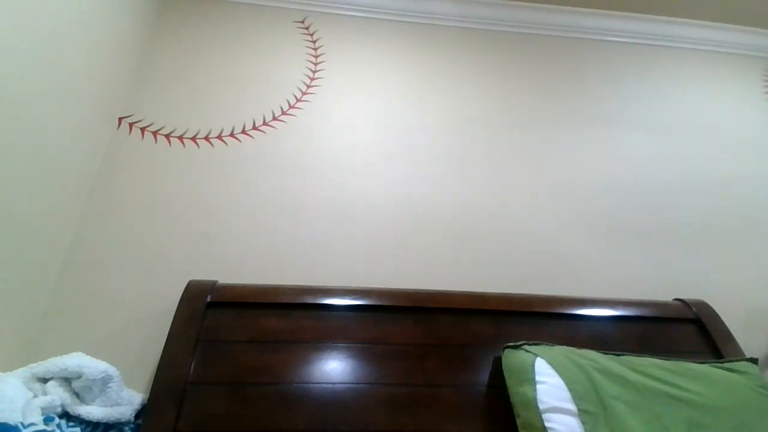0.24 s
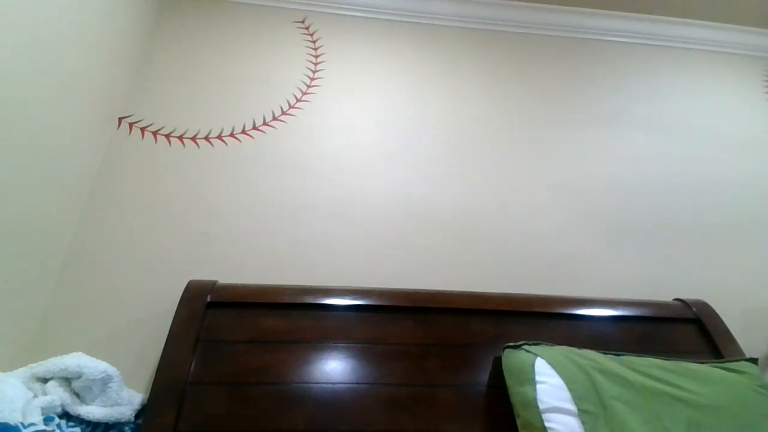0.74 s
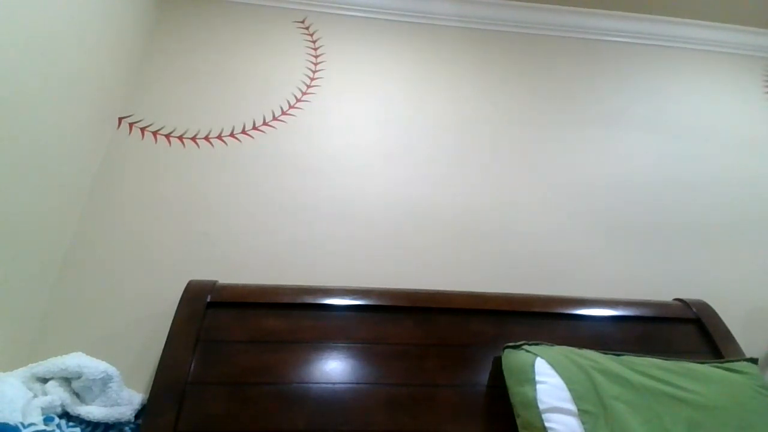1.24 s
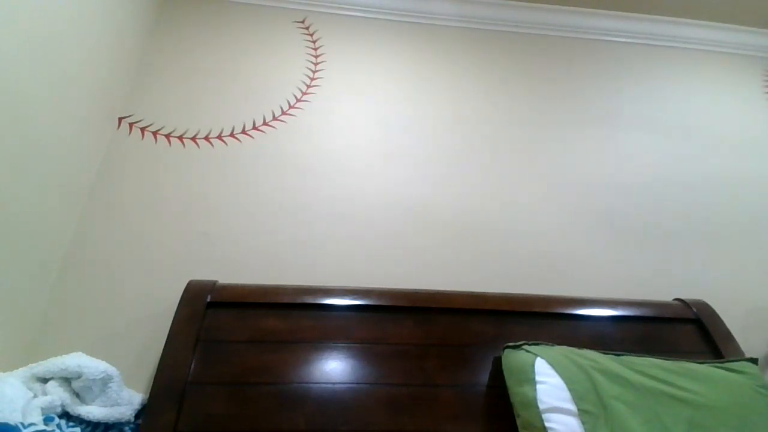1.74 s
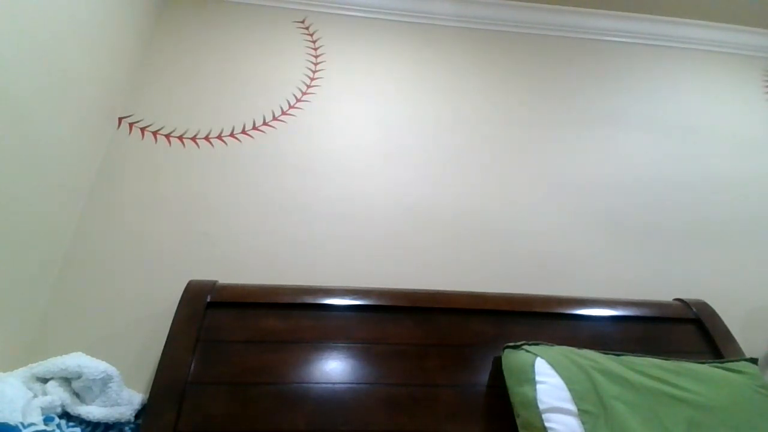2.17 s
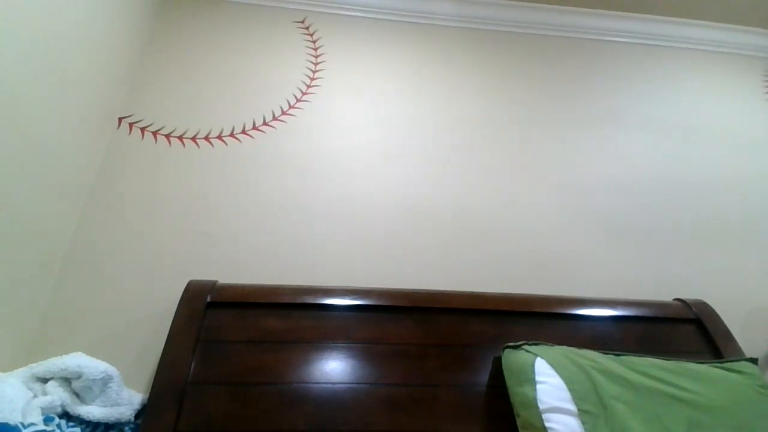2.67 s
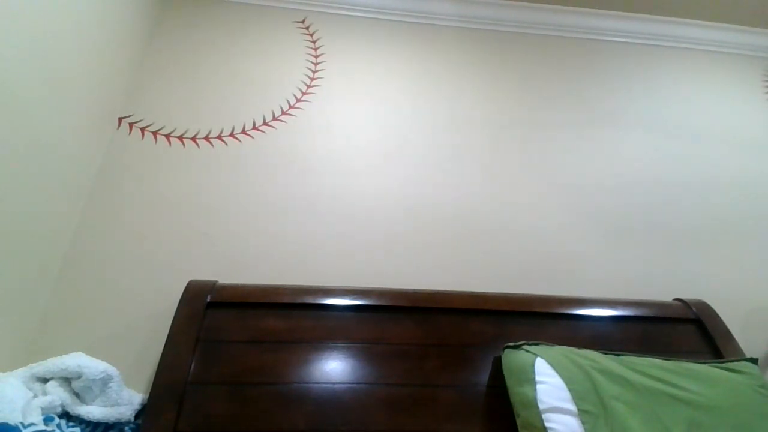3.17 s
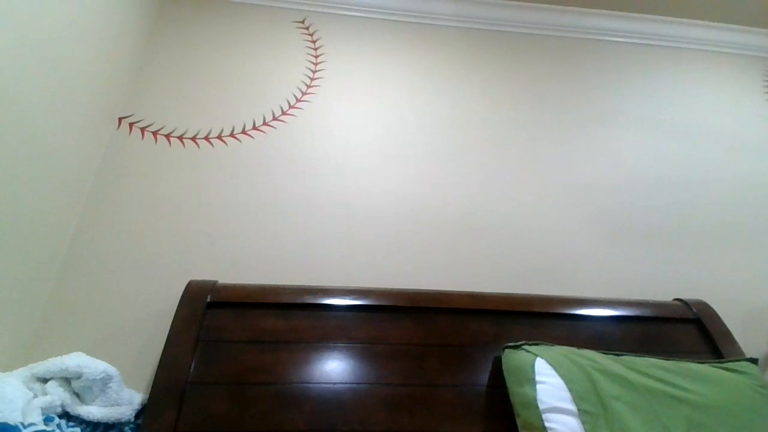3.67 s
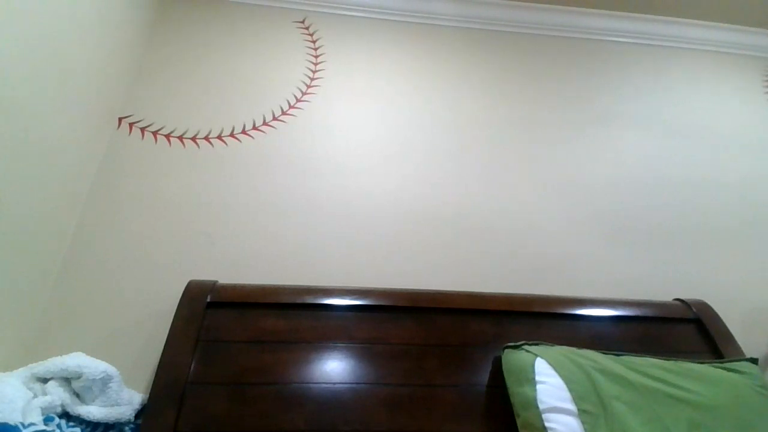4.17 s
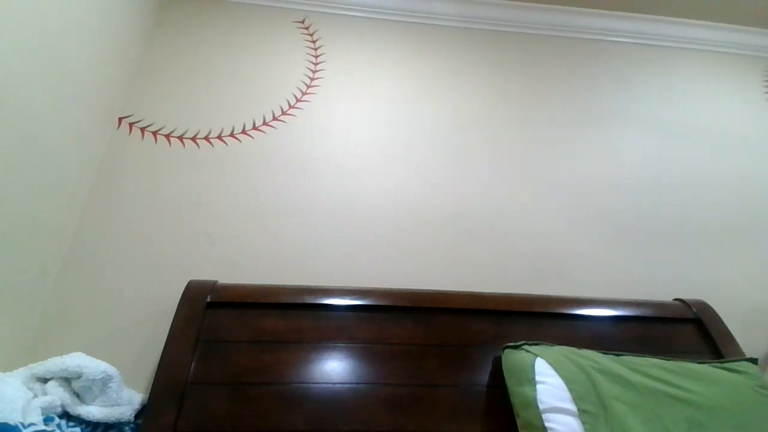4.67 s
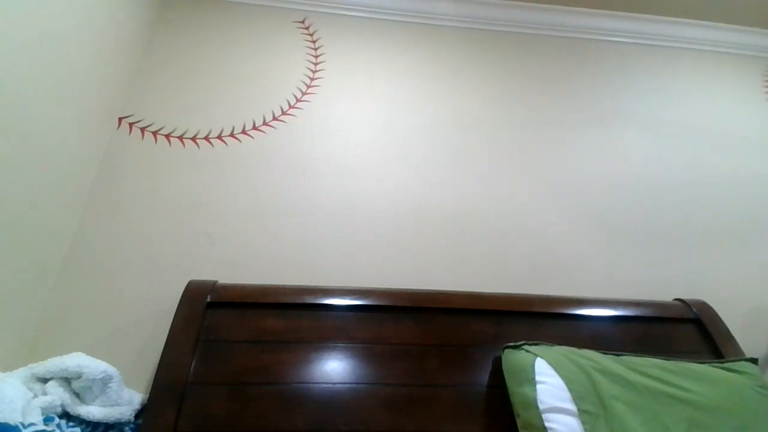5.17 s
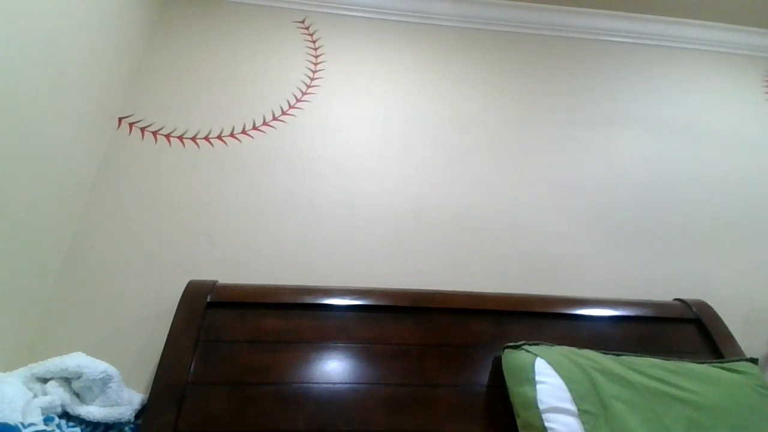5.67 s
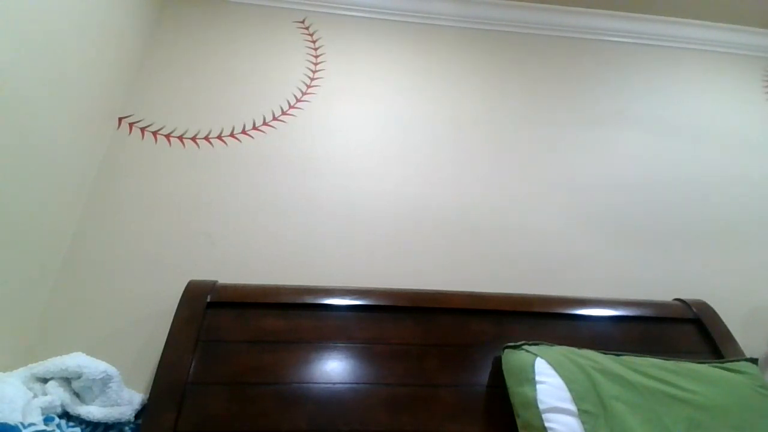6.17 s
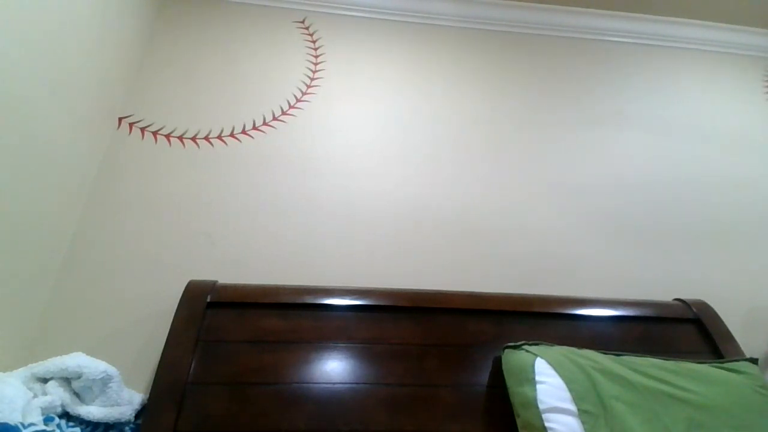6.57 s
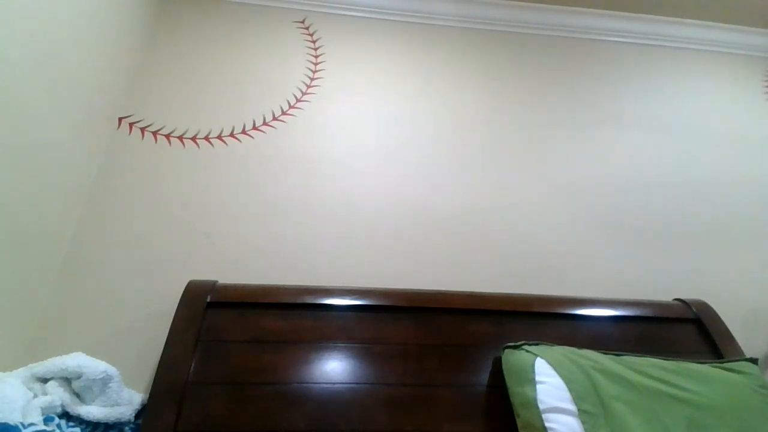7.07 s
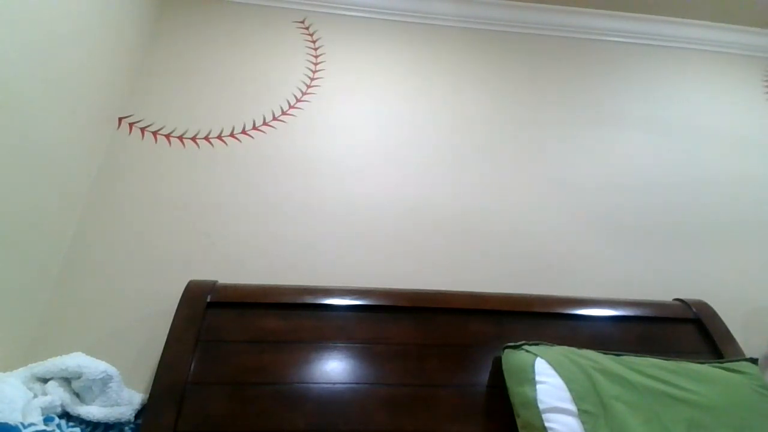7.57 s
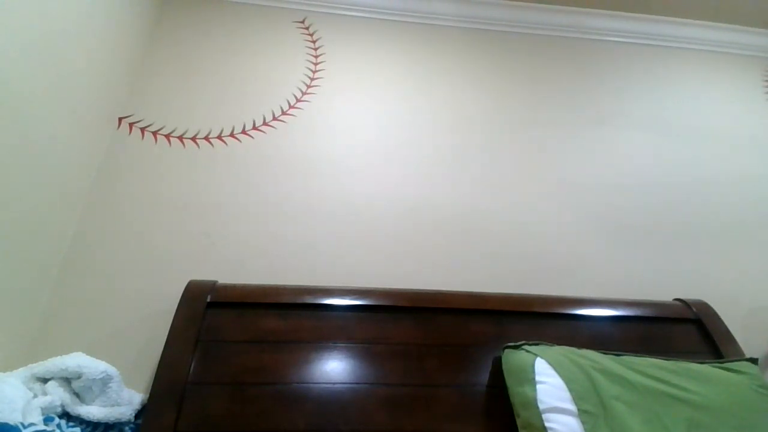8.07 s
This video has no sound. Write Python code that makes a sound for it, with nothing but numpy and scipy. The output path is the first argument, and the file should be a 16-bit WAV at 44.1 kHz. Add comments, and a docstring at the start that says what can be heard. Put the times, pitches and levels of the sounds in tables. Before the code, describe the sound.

Someone rummages irregularly through drawing supplies in a small bedroom, knocking wood and drawing out paper, while a fan hums steadily.

```python
"""Pencils and pens click, rattle and slide in their box, things are set down on wood, then paper is
drawn out and laid aside with a soft bump, in a small bedroom where a fan hums and rumbles steadily.
Contacts are coloured noise bursts and struck damped modes; sliding, scraping and paper are coloured
noise shaped by motion and grain; the fan is wavering sines plus noise. Reflections and short tails
give the room; level and phase differences give two closely spaced microphones."""
import sys
import numpy as np
from scipy import signal
from scipy.fft import rfft, irfft, next_fast_len
from scipy.io import wavfile
from scipy.ndimage import map_coordinates

SR = 44100
rng = np.random.default_rng(int(sys.argv[2]) if len(sys.argv) > 2 else 0)


def master_out(mix):
    """Clip the mix to full scale and print it as 16-bit PCM to the path in sys.argv[1]."""
    frames = np.transpose(np.atleast_2d(mix))
    ceiling = np.clip(frames, -1, 1)
    pcm = np.round(ceiling * 32767).astype(np.int16)
    wavfile.write(sys.argv[1], SR, pcm)


N = 366912

# basic spectrum of a contact between hard parts: frequency_hz, level_db
CONTACT_COLOUR = [(100, -18), (250, -3), (480, -7), (900, -8), (1400, -7.5), (2300, -8), (4000, -6),
                  (8000, -9.5), (16000, -15.5)]
# left-right correlation chosen for the stereo image, wide in the middle range, narrow in the lows
# and the extreme highs: frequency_hz, correlation (-1 to 1)
STEREO_IMAGE = [(250, 0.98), (600, 0.9), (1200, 0.61), (1900, 0.053), (3200, -0.54), (4500, -0.5),
                (6200, -0.069), (9000, 0.011), (11500, 0.13), (12400, 1)]
# reverberation time of the bedroom: frequency_hz, t60_s
ROOM_T60 = [(150, 0.43), (500, 0.26), (1500, 0.29), (5000, 0.27), (15000, 0.18)]


def amp(db):
    """Level to amplitude: 20 dB is a factor of ten."""
    return 10 ** (np.asarray(db) / 20)


def unit(x):
    """Normalisation to an rms of 1."""
    return x / np.sqrt(np.mean(x ** 2) + 1e-20)


def along(points, hz):
    """Interpolation of (frequency, value) points on a logarithmic frequency axis."""
    f, v = np.transpose(points)
    return np.interp(np.log(hz + 1e-3), np.log(f), v)


def wobble(rate):
    """Random modulation: a smooth curve through random knots, rate of them a second."""
    knots = rng.standard_normal(int(N * rate / SR) + 4)
    return map_coordinates(knots, [np.arange(N) * rate / SR])


def filtered(x, response):
    """Linear filtering: the spectrum is multiplied by a function of frequency."""
    n = x.shape[-1]
    m = next_fast_len(n + 8192)
    hz = np.fft.rfftfreq(m, 1 / SR)
    return irfft(rfft(x, m) * response(hz), m)[..., :n]


def spread(pair, correlation):
    """Partial coherence: two independent signals mix into left and right of a given correlation."""
    def mid_side_gains(hz):
        angle = np.arccos(np.clip(along(correlation, hz), -1, 1)) / 2
        return np.array([np.cos(angle), np.sin(angle)])

    mid, side = filtered(pair, mid_side_gains)
    return np.array([mid + side, mid - side])


def noise(colour, correlation, size):
    """Spectral shaping: white noise becomes coloured stereo noise of rms 1."""
    white = spread(rng.standard_normal((2, size)), correlation)
    return unit(filtered(white, lambda hz: amp(along(colour, hz))))


def add(track, s, sound):
    """Superposition: a sound is mixed into the track at time s."""
    start = max(round(s * SR), 0)
    track[:, start:start + sound.shape[-1]] += sound[..., :N - start]


def reverberant_decay(x):
    """Exponential decay: each frequency band falls 60 dB in its own reverberation time."""
    hz, frames_s, z = signal.stft(x, SR, nperseg=256)
    decay = amp(-60 * frames_s / along(ROOM_T60, hz)[:, None])
    return signal.istft(z * decay, SR, nperseg=256)[1]


def burst(colour, early_s, tail_db, rise_s):
    """Impact in a room: noise with three sharp rebounds in a dense bunch, then a reverberant tail."""
    t = np.arange(SR // 2) / SR
    tail = reverberant_decay(noise(colour, STEREO_IMAGE, len(t)))[:, :len(t)]
    # one rebound at a random moment in each third of the early part
    rebounds_s = (np.arange(3)[:, None] + rng.uniform(.15, .85, (3, 1))) * early_s / 3
    spike_power = np.sum(np.exp(-((t - rebounds_s) / .0004) ** 2), 0)
    early = noise(colour, STEREO_IMAGE, len(t)) * np.sqrt(.55 + 2.6 * spike_power)
    early = early * np.exp(-((t - rise_s) / early_s) ** 4)
    return (early + amp(tail_db) * tail) * (1 - np.exp(-t / rise_s))


def ring(modes, scatter_db, detune):
    """Modal vibration: a blow excites damped sines, with new strengths and tuning each time."""
    t = np.arange(SR // 2) / SR
    hz, db, t60_s = np.transpose(modes)[:, :, None]
    size, shift, phase = rng.standard_normal((3, len(hz), 1))
    waves = np.sin(2 * np.pi * (hz * (1 + detune * shift) * t + phase))
    level_db = db + scatter_db * np.clip(size, -2, 1) - 60 * t / np.minimum(t60_s, .6)
    onset = 1 - np.exp(-t / 0.0038)
    return np.sum(amp(level_db) * waves, 0) * onset


def stroke(s, length_s, swell_db, attack_s, release_s):
    """Motion envelope: a hand movement gets going, swells or fades evenly in dB, then comes to rest."""
    t = np.arange(N) / SR - s
    rise = np.clip(t / attack_s, 0, 1)
    rest = np.exp(-np.maximum(t - length_s, 0) / release_s)
    return rise * amp(swell_db * np.clip(t / length_s, 0, 1)) * rest


def clicks():
    """Contact hardness: hard contacts rise at once and brightly, soft ones swell and ring the barrels."""
    # pencils and plastic cases touching: start_s, level_db, then low body_db, snap_db and
    # sharp edge_db relative to the level
    contacts = [(0.37, -41, -12.5, -18.5, -15.5), (0.507, -27.5, -18, -24.5, -19),
                (0.551, -37.5, -19, -24, -41), (0.651, -39.5, -8.5, -17, -9.5), (0.736, -44, -9, -48, -35),
                (0.798, -48, -20, -27, -36), (1.27, -35, -19, -22, -17), (1.357, -34.5, -9, -15.5, -16.5),
                (1.376, -40, -9, -14, -11), (1.464, -36, -11, -22, -42), (1.673, -36, -16, -15, -17.5),
                (1.785, -32.5, -3.5, -19.5, -13.5), (1.801, -33.5, -13.5, -33, -48),
                (1.877, -22.5, -12.5, -12, -17.5), (1.936, -19, -13, -2.5, 3),
                (1.955, -19, -17.5, -6.5, -5), (2.022, -29, -13.5, -20, -34), (2.559, -37, 6, -11, -1),
                (2.678, -40.5, 3.5, -11.5, -3), (2.787, -35.5, -15, -29, -29),
                (2.822, -32.5, -16, -19, -13), (3.115, -37, -10.5, -25, -22), (3.337, -49.5, -10, 12, 20),
                (3.614, -38.5, -6, -28, -33), (3.659, -25, -11.5, -9, -5), (3.683, -38, -20, -8, -5),
                (3.741, -42.5, -14, -41, -9), (4.364, -56, -8, -26, -25), (4.971, -40.5, -1, -23, -27),
                (5.264, -37.5, -33, -25, -30), (5.418, -62, -16, 11, -13), (5.58, -37, -6, -12.5, -29),
                (5.676, -33.5, -24, -16.5, -16.5), (5.716, -34, -12, -20, -34), (6.455, -40.5, -2, 4, 15),
                (6.484, -36.5, 0, -11, -22), (6.622, -44, 1, -7, 12), (7, -39, -25, 0, 16),
                (7.64, -47, -10, 3, 12), (7.838, -26, -42, -6, -17.5)]
    # modes of the box and the barrels in it: frequency_hz, level_db, t60_s
    barrels = [(690, -8.5, 0.38), (902, -2, 0.13), (1180, 1, 0.073), (1289, 4.5, 0.077), (1414, -6, 0.1),
               (1910, -13, 0.092)]
    out = np.zeros((2, N))
    hz, base_db = np.transpose(CONTACT_COLOUR)
    for s, db, body_db, snap_db, edge_db in contacts:
        tilt = [(450, body_db + 10.5), (900, 0), (1600, 0.0042),
                (3500, snap_db + 9.0), (5500, snap_db + 6.0), (9500, edge_db + 5)]
        colour = np.transpose([hz, base_db + along(tilt, hz)])
        softness = amp(-.5 * np.clip(edge_db + 12, -12, 12))  # a weak edge means a soft contact
        impact = burst(colour, early_s=0.00884, tail_db=-3.5, rise_s=.0035 * softness)
        add(out, s, amp(db - 5) * impact)
        add(out, s, amp(db - 21) * softness * ring(barrels, scatter_db=6, detune=0.0125))
    return out


def scrapes():
    """Friction noise: each push of a barrel along the others swells and fades with a rough level."""
    # single pushes: start_s, level_db, length_s, brightness_db
    pushes = [(0.0, -49.5, 0.0032, 2), (1.108, -54, 0.016, -1.5), (1.643, -47, 0.01, -9),
              (2.279, -46, 0.017, 0), (2.377, -37.5, 0.017, -4.5), (2.577, -46, 0.01, -1),
              (3.561, -52.5, 0.014, -10), (4.89, -48, 0.023, -14.5), (5.031, -43.5, 0.023, -5.5),
              (5.162, -46, 0.019, 12), (5.23, -44, 0.015, -8.5), (5.396, -46.5, 0.014, -11),
              (5.616, -50.5, 0.0073, -5), (5.965, -55, 0.014, 11), (7.028, -49, 0.012, 8),
              (7.281, -46.5, 0.0074, 8)]
    out = np.zeros((2, N))
    hz, base_db = np.transpose(CONTACT_COLOUR)
    for s, db, length_s, bright_db in pushes:
        tilt = [(500, -4.5), (1500, -0.1), (3500, bright_db - 7.5),
                (7500, bright_db - 8.5), (14000, bright_db - 10.5)]
        colour = np.transpose([hz, base_db + along(tilt, hz)])
        push = burst(colour, early_s=1.78 * length_s, tail_db=2.5, rise_s=length_s)
        add(out, s, amp(db - 2.0) * push)
    roughness = amp(0.73 * wobble(220))
    return out * roughness


def sliding():
    """Stick-slip friction: barrels catch and slip, so a scrape carries many tiny decaying ticks."""
    # stirs of the pencils: start_s, length_s, level_db, swell_db from start to end
    stirs = [(0.546, .06, -59, -14), (0.652, 0.13, -59.5, -13), (1.282, 0.072, -54.5, 4),
             (1.357, 0.16, -48.5, -7.5), (1.586, 0.34, -54, -13), (2.467, 0.3, -45, -22.5),
             (2.79, 0.11, -59, -6), (3.015, 0.052, -67.5, 9.5), (3.603, 0.077, -59, 8.5),
             (4.84, 0.015, -61, -1), (5.004, 0.029, -50.5, 6), (5.038, 0.14, -45, -11),
             (5.163, 0.14, -49, -6), (5.37, 0.013, -57, -2.5), (5.409, 0.034, -54, -2),
             (5.507, 0.028, -51, -0.5), (5.582, 0.17, -50.5, -3.5), (5.893, 0.15, -70, -6)]
    # mean spectrum of the sliding: frequency_hz, level_db
    slide_colour = [(120, -21), (250, -3), (400, -12), (600, -10), (950, -4), (1400, -8), (2000, -10),
                    (2600, -18), (3300, -16), (7000, -24.5), (10000, -27.5), (16000, -29)]
    slips_per_s, slip_s = 130, .003  # mean rate; decay time constant of each slip's power
    attack_s, release_s = 0.0089, 0.029  # rise time; time constant of coming to rest
    colour_scatter_db = 1.5  # each stir moves other barrels, so its colour varies

    slip_sizes = amp(4 * rng.standard_exponential(N).clip(0, 3))
    slips = (rng.random(N) < slips_per_s / SR) * slip_sizes
    slip_power = signal.lfilter([1], [1, -np.exp(-1 / (slip_s * SR))], slips ** 2)
    grain = unit(np.sqrt(slip_power + .12))  # the constant is a steady scrape between slips

    out = np.zeros((2, N))
    hz, base_db = np.transpose(slide_colour)
    for s, length_s, db, swell_db in stirs:
        colour = np.transpose([hz, base_db + colour_scatter_db * rng.standard_normal(len(hz))])
        motion = stroke(0, length_s, swell_db, attack_s, release_s)[:SR // 2]
        add(out, s, amp(db - 0.5) * motion * noise(colour, STEREO_IMAGE, SR // 2))
    return grain * out


def squeaks():
    """Frictional squeal: a short slip of plastic on plastic sings as one narrow band of noise."""
    # start_s, pitch_hz, level_db
    slips = [(0.52, 12400, -56), (1.70, 12500, -57), (1.799, 12400, -57), (2.39, 12240, -51),
             (2.44, 12700, -39.5), (2.558, 12100, -48.5), (5.050, 7100, -49), (5.091, 7700, -45.5),
             (5.178, 6750, -50), (5.580, 7530, -52), (5.619, 7540, -46), (5.68, 4630, -42),
             (5.681, 6700, -47)]
    out = np.zeros((2, N))
    for s, hz, db in slips:
        band = np.transpose([hz * np.array([.88, .965, 1, 1.035, 1.12]), [-50, -13, 0, -13, -50]])
        add(out, s, amp(db) * burst(band, early_s=.011, tail_db=-8, rise_s=.004))
    return out


def hollow(x):
    """Cavity resonance: the box lifts the sound around its own frequencies."""
    # frequency_hz, width_hz, gain_db
    resonances = [(670, 290, -1), (943, 150, 3.5), (1139, 74, 6.5), (1410, 220, 3), (2054, 80, 3),
                  (2600, 900, 1.5), (7420, 230, 2.5)]

    def gain(hz):
        return amp(sum(db / (1 + (2 * (hz - centre) / width) ** 2) for centre, width, db in resonances))

    return filtered(x, gain)


def paper():
    """Friction of a sheet: it rubs dully and hisses as it glides, with a fine uneven grain."""
    # start_s, length_s, hiss_db, rub_db, swell_db from start to end
    strokes = [(6.368, 0.085, -54.5, -59.5, 1.5), (6.45, 0.11, -48, -44, -12.5),
               (6.548, .016, -55, -55.5, -0.5), (6.61, 0.4, -48, -56.5, -5), (6.687, 0.054, -49, -69, 4.5),
               (7.004, 0.057, -65, -54, -0.5), (7.086, 0.016, -54, -66, 1.5), (7.22, 0.055, -60.5, -83, -2),
               (7.273, 0.092, -52.5, -54, -7), (7.412, 0.031, -64, -60.5, -6.5),
               (7.478, 0.045, -84, -59, -7), (7.541, 0.064, -60, -58.5, 0.5),
               (7.636, 0.044, -51.5, -58.5, -1), (7.68, 0.13, -49, -47, 5.5), (7.829, 0.09, -44, -37, -11),
               (7.925, 0.12, -54, -54, -6)]
    # spectra of the dull rub and of the hiss: frequency_hz, level_db
    rub_colour = [(120, -10), (250, -0.5), (400, 0), (520, -0.5), (700, 3), (1050, -3), (1700, 0.5),
                  (2600, -3.5), (4500, -8), (8000, -17), (16000, -37.5)]
    hiss_colour = [(800, -9.5), (2500, -7.5), (4500, -0.5), (7000, 3.5), (10000, -0.5), (13000, 2.5),
                   (16000, -1.5)]
    attack_s, release_s = 0.012, 0.019  # rise time; time constant of coming to rest
    held_from_s, held_to_s, held_db = 6.34, 8.1, -69.5  # the sheet whispers while in the hand

    held = stroke(held_from_s, held_to_s - held_from_s, 0, attack_s, release_s)
    rub_power = np.zeros(N)
    hiss_power = (amp(held_db) * held) ** 2
    for s, length_s, hiss_db, rub_db, swell_db in strokes:
        motion = stroke(s, length_s, swell_db, attack_s, release_s)
        rub_power += (amp(rub_db) * motion) ** 2
        hiss_power += (amp(hiss_db) * motion) ** 2
    grain = amp(1.14 * wobble(90) + 2 * wobble(700))
    rub = np.sqrt(rub_power) * noise(rub_colour, STEREO_IMAGE, N)
    hiss = np.sqrt(hiss_power) * noise(hiss_colour, STEREO_IMAGE, N)
    return grain * (rub + hiss)


def knocks():
    """Modal excitation: a blunt blow rings the wooden top and adds a low thump and a faint crack."""
    # things set down on wood: start_s, level_db, then thump_db, hollow ring_db and crack_db
    # relative to the level
    blows = [(2.408, -18.5, -16.5, 0, -19), (2.918, -42, -12, -1, -36), (4.483, -33.5, -1.5, 1, -20.5),
             (4.566, -27.5, 1, -4, -18)]
    # modes of the wooden top: frequency_hz, level_db, t60_s
    wood = [(256.3, -8, 0.29), (338.6, -5, 0.39), (536, 10.5, 0.073), (496, -7, 0.3), (670, -8.5, 0.34),
            (986, -6, 0.039), (1150, -19, 0.36), (1316, -11, 0.23)]
    out = np.zeros((2, N))
    for s, db, thump_db, ring_db, crack_db in blows:
        colour = [(70, thump_db - 15), (150, thump_db + 11.5), (270, thump_db + 7.5),
                  (400, -0.5), (510, ring_db + 11.5), (620, -5.0), (950, 1.5), (1500, -12),
                  (2800, crack_db - 0.5), (15000, crack_db - 16)]
        add(out, s, amp(db - 9.5) * burst(colour, early_s=0.026, tail_db=0.5, rise_s=.0015))
        add(out, s, amp(db + ring_db - 12.5) * ring(wood, scatter_db=1, detune=.004))
    return out


def bumps():
    """Soft impact: the pad lands flat and softly, so only its lowest modes sound."""
    # landings of the pad: start_s, level_db
    landings = [(7.762, -36.5), (7.813, -41.5), (7.848, -50)]
    # low modes of the landing: frequency_hz, level_db, t60_s
    pad = [(81, -11, .15), (118.3, 7.5, 0.34), (146.6, 11.5, 0.2), (179, -0.5, 0.45)]
    out = np.zeros((2, N))
    for s, db in landings:
        add(out, s, amp(db - 4.0) * ring(pad, scatter_db=1.5, detune=0.018))
    return out


def roomy(x, wet_db):
    """Reverberation by convolution: continuous sounds get the bedroom's short tail."""
    tail = reverberant_decay(rng.standard_normal(SR // 2))
    tail = tail[None] / np.linalg.norm(tail)
    return x + amp(wet_db) * signal.fftconvolve(x, tail, axes=1)[:, :N]


def fan():
    """Tonal and turbulent noise: slightly wavering hum lines, rushing air and a slow draught."""
    # lines of fan and mains: frequency_hz, level_db
    hum_lines = [(29.8, -72), (59.8, -64.5), (89.5, -66), (120, -54), (143, -66.5), (246, -70.5)]
    # spectra of the rushing air and of the draught on the microphones: frequency_hz, level_db
    air_colour = [(22, -13), (32, -12.5), (43, -15.5), (55, -23), (75, -24), (120, -27), (185, -31),
                  (215, -38.5), (250, -34), (300, -44), (420, -46), (510, -48), (650, -50.5), (1500, -53.5),
                  (4400, -57.5), (16000, -57.5)]
    draught_colour = [(1, -12), (3.5, -4), (6.5, 10.5), (9, -23.5), (12, -5.5), (14.3, 7), (17, -16.5),
                      (24, -14), (40, -74)]
    # left-right correlation chosen for the background's stereo image:
    # frequency_hz, correlation (-1 to 1)
    background_image = [(200, 0.96), (500, 0.42), (1000, 0.55), (2000, -0.11), (3500, -0.15), (6000, 0.025),
                        (11500, -0.074), (12400, 0.49)]
    t = np.arange(N) / SR
    hum = np.zeros(N)
    for hz, db in hum_lines:
        level = amp(db + 0.15 * wobble(2.71)) * np.sqrt(2)  # rms to peak
        hum += level * np.sin(2 * np.pi * hz * t + 0.36 * wobble(1.56))
    air = amp(-48) * noise(air_colour, background_image, N)
    draught = amp(-35.5) * noise(draught_colour, background_image, N)
    return hum + air + filtered(draught, lambda hz: hz < 60)


def near_walls(x):
    """Early reflection: wall and furniture return delayed, weaker copies."""
    # delay_s, level_db
    reflections = [(.00137, -43.5), (.0031, -34.5), (.0049, -36), (.0083, -22.5)]

    def response(hz):
        return 1 + sum(amp(db) * np.exp(-2j * np.pi * hz * s) for s, db in reflections)

    return filtered(x, response)


def microphone_pair(x):
    """Stereo level and phase difference: opposite gains and phases lean the sound a little left."""
    # phase by which the left microphone leads: frequency_hz, phase_rad
    lead = [(200, 0.12), (600, -0.35), (1300, 0.22), (2000, -0.28), (2700, -0.9), (3900, -0.095),
            (5000, 0.54), (7000, 0.42)]

    def left_right(hz):
        tilt_db = along([(500, 0.49), (1200, 0.68), (2200, 1.35), (8000, 1.07)], hz)
        left = amp(tilt_db) * np.exp(.5j * along(lead, hz))
        return np.array([left, 1 / left])

    return filtered(x, left_right)


def scene():
    """Superposition: handling between near walls joins the fan, and both reach the microphones."""
    in_box = hollow(clicks() + scrapes() + roomy(sliding(), wet_db=-1.5))
    direct = in_box + knocks() + bumps() + squeaks() + roomy(paper(), wet_db=-6.5)
    return microphone_pair(near_walls(direct) + fan())


def record(dry):
    """Band limiting: the response falls to nothing across 400 Hz around the upper limit."""
    top_hz = 16000
    return filtered(dry, lambda hz: np.clip((top_hz - hz) / 400 + .5, 0, 1))


dry = scene()
out = record(dry)
master_out(out)
```